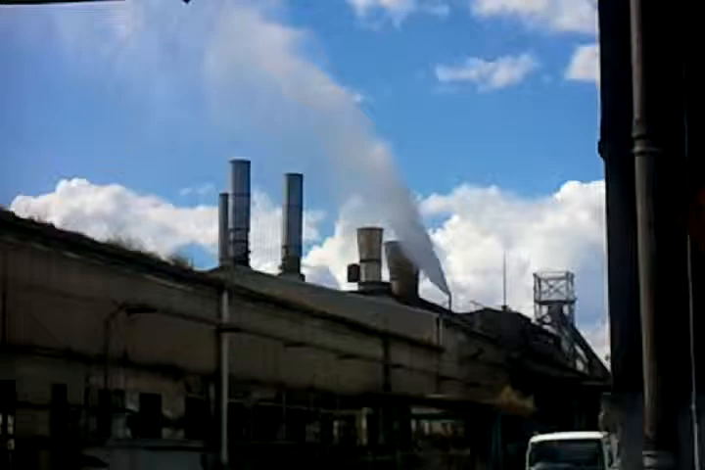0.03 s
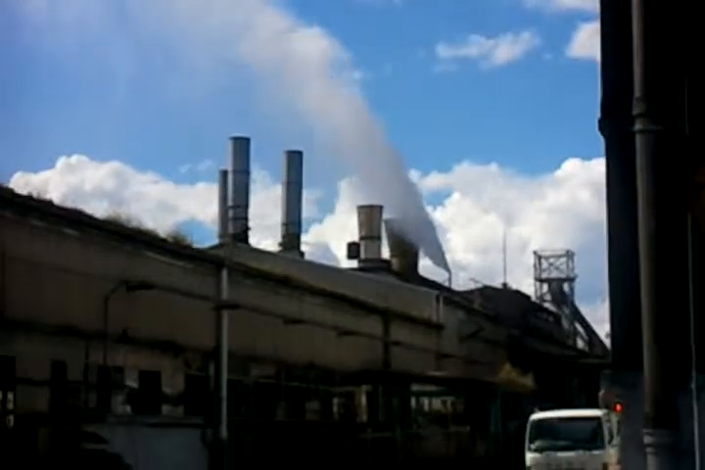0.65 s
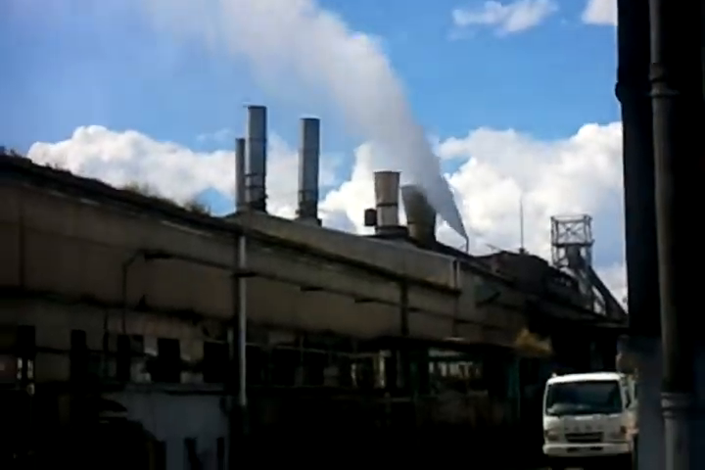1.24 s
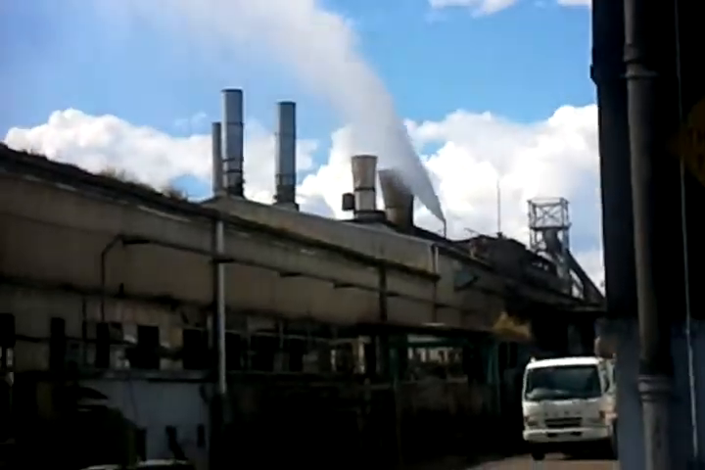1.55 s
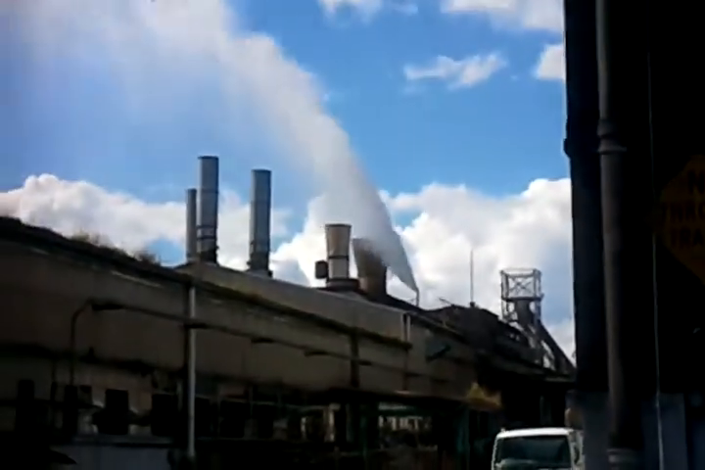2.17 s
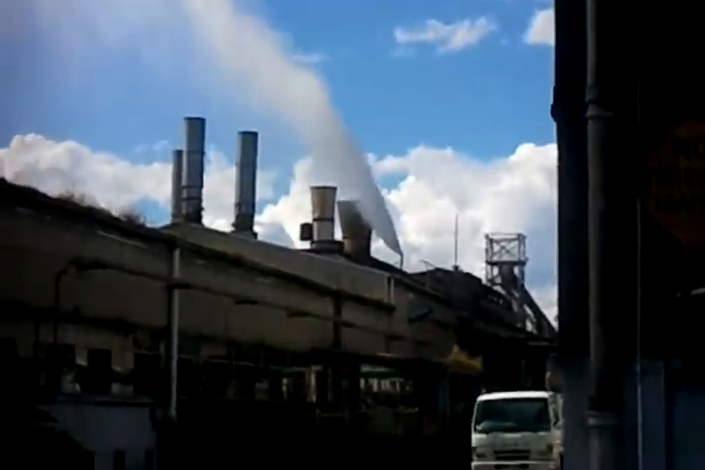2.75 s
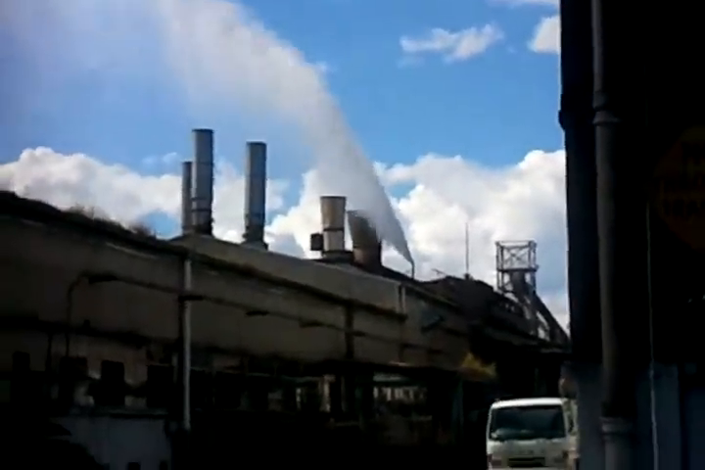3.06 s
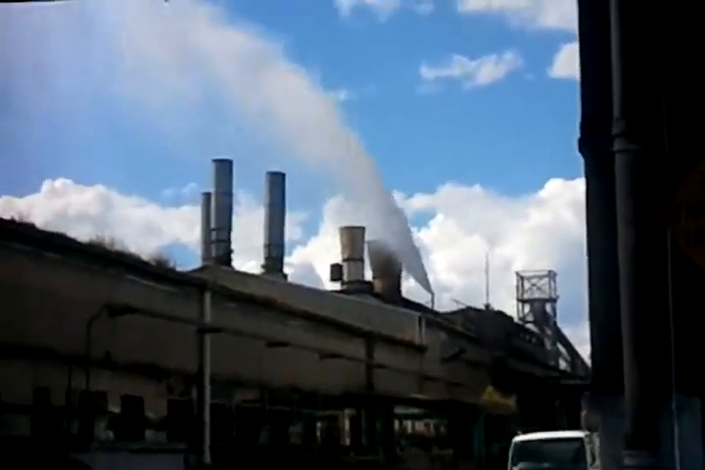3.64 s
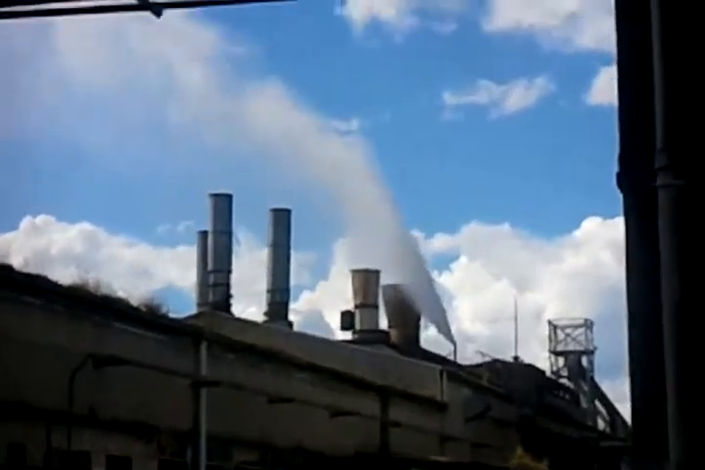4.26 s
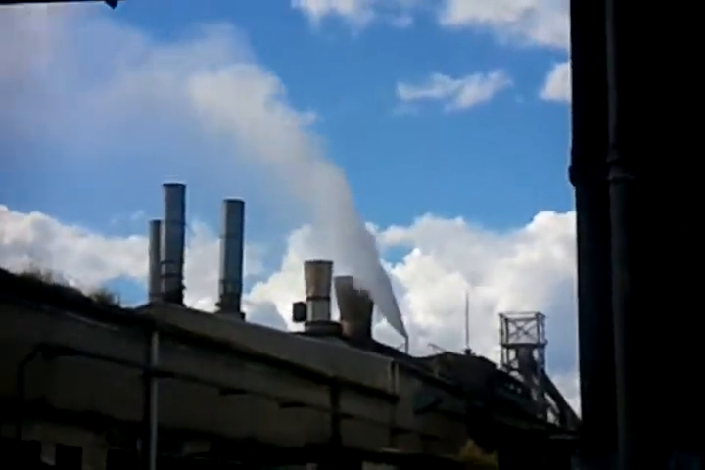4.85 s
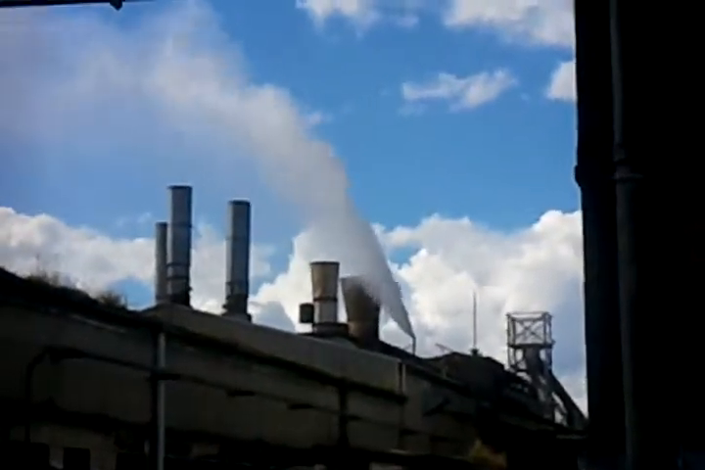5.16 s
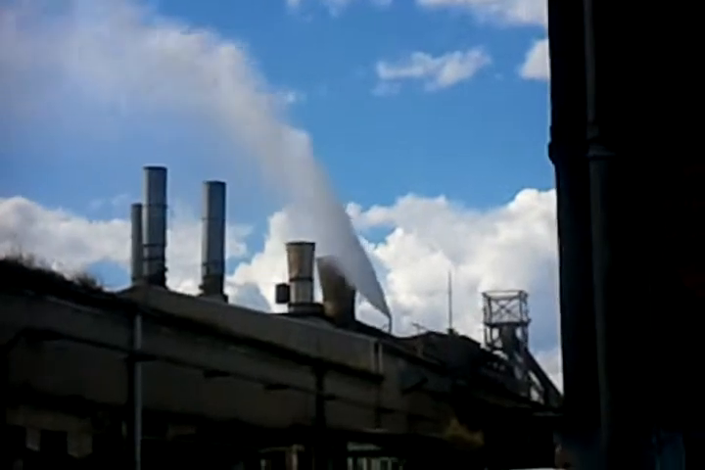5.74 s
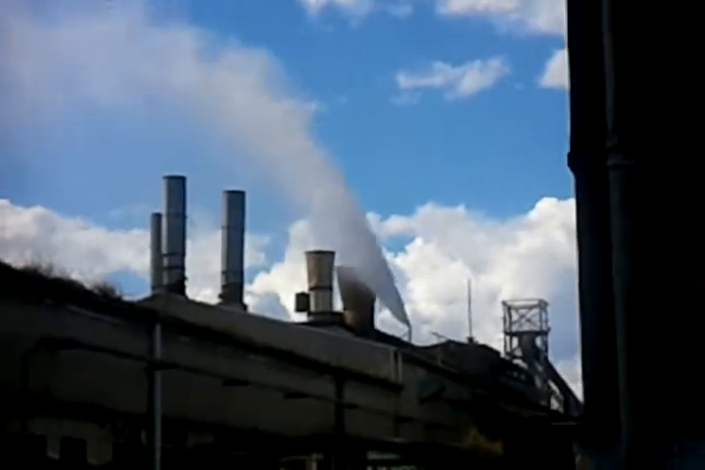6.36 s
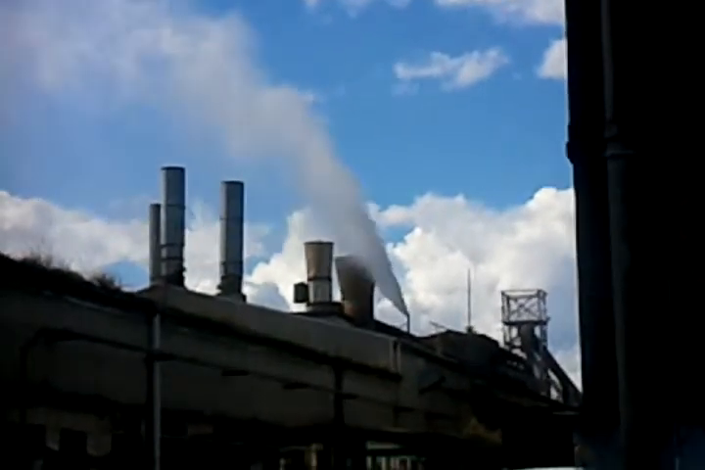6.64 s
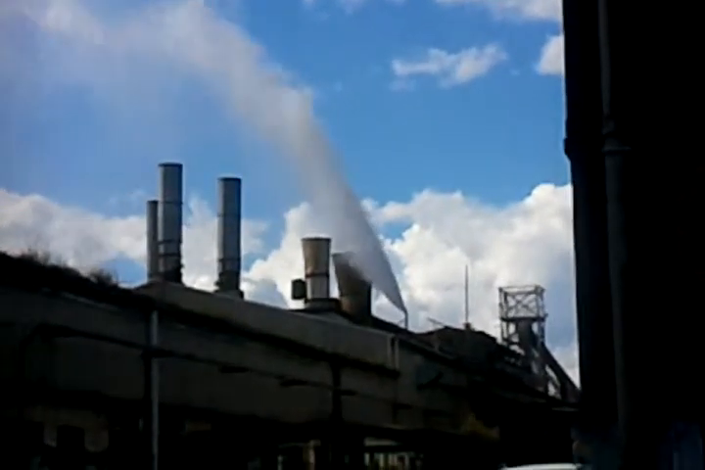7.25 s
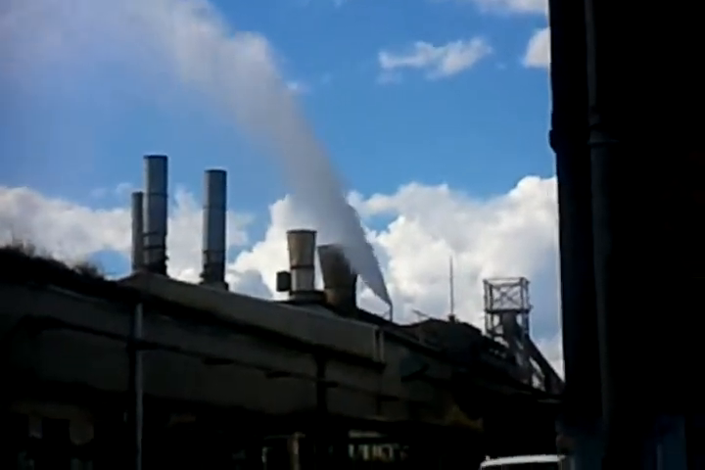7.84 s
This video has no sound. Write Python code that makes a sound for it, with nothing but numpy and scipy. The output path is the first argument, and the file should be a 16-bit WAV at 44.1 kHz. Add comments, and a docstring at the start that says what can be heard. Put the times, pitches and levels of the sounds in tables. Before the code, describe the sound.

After a brief silence, steam blowing from a factory roof vent fades in quickly and roars loudly and steadily to the end. Its hiss shifts a little in the wind, with a hollow ring from the pipe mouth. Underneath, a faint low hum wavers, catching and dropping out. It is heard across an outdoor yard through a small, slightly overloaded hand-held microphone.

```python
"""A steam vent on a factory roof blows off, a loud steady roar across the yard.
The jet's turbulence rings the pipe mouth, wind swings the hiss about and a close reflection hollows it.
Underneath, the pipe's low, wavering hum catches and drops out in spells.
It all fades in after a silence, through a small hand-held recorder, overloaded and narrow in band."""
import sys
import numpy as np
from scipy import signal
from scipy.io import wavfile
from scipy.ndimage import uniform_filter1d

SR = 44100
rng = np.random.default_rng(int(sys.argv[2]) if len(sys.argv) > 2 else 0)


def generate_wav(sig):
    """Save sig (samples, or channels by samples) to the path in sys.argv[1] as 16-bit PCM at SR."""
    pcm = np.round(np.clip(np.atleast_2d(sig).T, -1, 1) * 32767).astype(np.int16)
    wavfile.write(sys.argv[1], SR, pcm)


N = 352800
TIME = np.arange(N) / SR

# The raw tone of the jet's turbulence. Each row: frequency in Hz, relative spectral level in dB.
JET_SPECTRUM = [(12, -17), (28, -13), (130, -7), (470, -5.5), (560, -11.5), (740, -4), (1000, -4.5),
                (1200, -1), (1720, -4.5), (2000, -8), (2400, -12.5), (3900, -10), (6000, -20),
                (8000, -17.5)]
# Peaks that colour the roar and give the hiss a hollow ring.
# Each row: centre in Hz, width in Hz, lift in dB.
COLOUR_PEAKS = [(850, 76, 4.5), (1456, 177, 2.4), (3285, 340, 3), (1590, 126, 1.5), (2620, 73, 3.5),
                (4010, 240, 2), (4810, 210, 3), (5740, 300, 3.5), (7040, 420, 0.6)]
# The ride of the rasp between roar and hiss. Each row: time in seconds, relative level in dB.
RASP_RIDE = [(1.2, -17.5), (4.29, -17.5), (5.48, -18.5), (6.14, -17.5), (7.25, -16.5), (7.41, -15),
             (7.8, -16)]
# The ride of the hiss as wind bends the plume. Each row: time in seconds, relative level in dB.
HISS_RIDE = [(1.05, -13.5), (1.12, -14.5), (1.5, -14), (1.54, -15.5), (2.68, -13), (2.91, -14.5),
             (4.61, -14.5), (4.65, -12), (5.12, -13), (5.14, -14.5), (5.35, -12.5), (5.82, -15),
             (7.11, -15.5), (7.13, -14), (7.83, -13.5), (7.85, -13.5)]
# A bounce off a surface by the microphone. Each row: time in seconds, delay in ms, share of direct sound.
REFLECTION = [(1.0, 1.5, 0.071), (2.0, 1.25, 0.1), (2.7, 1.19, .22), (4.0, 1.25, 0.097), (4.9, 1.18, 0.089),
              (6.0, 1.2, 0.11), (7.0, 1.3, 0.11), (8.0, 1.33, 0.12)]
# Surges of single peaks. Each row: middle in seconds, length in seconds, centre in Hz, extra lift in dB.
RING_SURGES = [(1.2, 0.82, 3276, 4), (2.95, .6, 1590, 3), (3.0, 1.6, 3250, 2.0), (4.65, 0.44, 870, 7.5),
               (4.92, .7, 3950, 4), (6.1, 1.3, 1590, 3.5), (6.8, 0.4, 845, 3.5), (7.75, 1.4, 1440, 5),
               (7.8, 1, 4030, 3.5)]
# The spells when the pipe tone catches. Each row: start in seconds, length in seconds, relative dB.
HUM_SPELLS = [(0.943, 0.3, -19.5), (1.283, 0.04, -28), (1.564, 0.52, -17), (2.326, 0.033, -25),
              (2.405, 0.099, -12), (2.636, 0.175, -19), (2.911, 0.069, -16), (3.063, 0.53, -18.5),
              (3.64, 0.55, -19), (4.408, 0.055, -18), (4.553, 0.039, -16), (4.637, 0.33, -19.5),
              (4.96, 0.045, -14), (5.078, 0.034, -17), (5.174, 0.115, -18), (5.333, 0.6, -18),
              (6.038, 0.36, -17.5), (6.435, 0.094, -19), (6.634, 0.151, -18.5), (6.835, 0.39, -16.5),
              (7.272, 0.1, -18), (7.784, 0.163, -15)]


def gain_of(db):
    """Decibels to amplitude."""
    return 10 ** (np.asarray(db) / 20)


def unit_rms(x):
    """Scales a signal to rms 1."""
    return x / np.sqrt(np.mean(x ** 2) + 1e-20)


def follow(rows, t):
    """The columns of an automation table at times t."""
    times, *columns = np.transpose(rows)
    return [np.interp(t, times, column) for column in columns]


def swing(rows, t):
    """A level ride as dB above its own average."""
    db = follow(rows, t)[0]
    return db - db.mean()


def wander(top_hz, count=30):
    """A random drift of rms 1, moving at rates up to top_hz."""
    rates = np.geomspace(top_hz / 20, top_hz, count)
    return unit_rms(sum(np.sin(2 * np.pi * (f * TIME + rng.random())) / np.sqrt(f) for f in rates))


def bell(hz, centre, width):
    """The bell curve of one peak, 1 at its centre."""
    return 1 / (1 + (2 * (hz - centre) / width) ** 2)


def low_pass(x, hz, taps):
    """A linear-phase high cut; more taps make it steeper."""
    return signal.oaconvolve(x, signal.firwin(taps, hz, window=("kaiser", 8), fs=SR)[None], "same")


def steam_jet(level_db=-5.5, roar_sway=0.26, unrest_db=0.18):
    """Turbulent noise roars out of the vent and across the yard, its level slightly restless."""
    frame, hop = 2048, 512
    t = np.arange(N // hop + 5) * hop / SR
    hz = np.fft.rfftfreq(frame, 1 / SR)
    real, imaginary, patches = rng.standard_normal((3, len(t), len(hz)))
    colour_db = roar_colour(hz) + plume_lean(t, hz) + yard_paths(patches) + ring_surges(t, hz)
    spectra = (real + 1j * imaginary) * gain_of(colour_db) * close_reflection(t, hz)
    roar = signal.istft(spectra.T, nperseg=frame, noverlap=frame - hop)[1][None, :N]
    fader_db = level_db + roar_sway * swing(RASP_RIDE, TIME) + unrest_db * wander(top_hz=4)
    return gain_of(fader_db) * unit_rms(low_pass(roar, 9500, taps=101))


def roar_colour(hz):
    """The steady EQ in dB: broad turbulence, with peaks that colour the roar and hollow the hiss."""
    points_hz, points_db = np.transpose(JET_SPECTRUM)
    turbulence_db = np.interp(np.log(hz + 1), np.log(points_hz), points_db)
    return turbulence_db + sum(db * bell(hz, centre, width) for centre, width, db in COLOUR_PEAKS)


def plume_lean(t, hz, rasp_sway=1.1):
    """The jet beams its highs, so rasp and hiss come and go as it leans; in dB."""
    rasp_band = np.interp(hz, [1300, 1900, 2800, 3400], [0, 1, 1, 0])
    hiss_band = np.interp(hz, [2900, 3500], [0, 1])
    rasp_db = np.outer(rasp_sway * swing(RASP_RIDE, t), rasp_band)
    hiss_db = np.outer(swing(HISS_RIDE, t), hiss_band)
    return rasp_db + hiss_db


def yard_paths(noise, depth_db=1.47):
    """Many paths across the yard interfere, so narrow patches of spectrum slowly swell and fade; in dB."""
    slow_noise = uniform_filter1d(noise, size=70, axis=0)
    return depth_db * unit_rms(uniform_filter1d(slow_noise, size=5, axis=1))


def close_reflection(t, hz):
    """One short bounce combs the spectrum for a hollow colour."""
    delay_ms, share = follow(REFLECTION, t)
    return 1 + share[:, None] * np.exp(-2j * np.pi * np.outer(delay_ms / 1000, hz))


def ring_surges(t, hz):
    """Now and then one of the peaks rings harder, in one smooth swell; in dB."""
    lift_db = 0
    for middle, length, centre, db in RING_SURGES:
        _, width, _ = min(COLOUR_PEAKS, key=lambda peak: abs(peak[0] - centre))
        arch = np.cos(np.pi * np.clip((t - middle) / length, -.5, .5)) ** 2
        lift_db = lift_db + np.outer(db * arch, bell(hz, centre, width))
    return lift_db


def pipe_hum(pitch_hz=217.4, attack_s=.05, release_s=.07, trim_db=-0.4, flutter_db=0.54):
    """The pipe's low tone catches, holds and drops out, fluttering in level and wavering in phase."""
    envelope = np.full(N, gain_of(-30.5))  # lingers faintly between spells
    for start, length, db in HUM_SPELLS:
        attack = np.clip(.5 + (TIME - start) / attack_s, 0, 1)
        release = np.clip(.5 + (start + length - TIME) / release_s, 0, 1)
        envelope = np.maximum(envelope, gain_of(db) * attack * release)
    envelope *= gain_of(trim_db + flutter_db * wander(top_hz=14))
    turns = pitch_hz * TIME + 0.038 * wander(top_hz=12)
    return envelope * np.sqrt(2) * np.sin(2 * np.pi * turns)


def overload(x, ceiling, hardness):
    """A soft clipper: clean on small swings, flat at the ceiling."""
    return x / (1 + abs(x / ceiling) ** hardness) ** (1 / hardness)


def scene():
    """The steam jet over the hum of its pipe."""
    return steam_jet() + pipe_hum()


def record(dry, drive_db=0.5, open_s=.777, full_s=1.0, band_hz=8070):
    """The recorder overloads, fades in and cuts the top; its output shaves the peaks again."""
    driven = overload(dry * gain_of(drive_db), ceiling=0.73, hardness=7.5)
    fade_in = np.interp(TIME, [open_s, full_s], [0.14, 1], left=0)
    narrow = low_pass(driven * fade_in, band_hz, taps=111)
    shaved = overload(narrow, ceiling=0.69, hardness=50)
    return low_pass(shaved, 15720, taps=801)


dry = scene()
out = record(dry)
generate_wav(out)
```